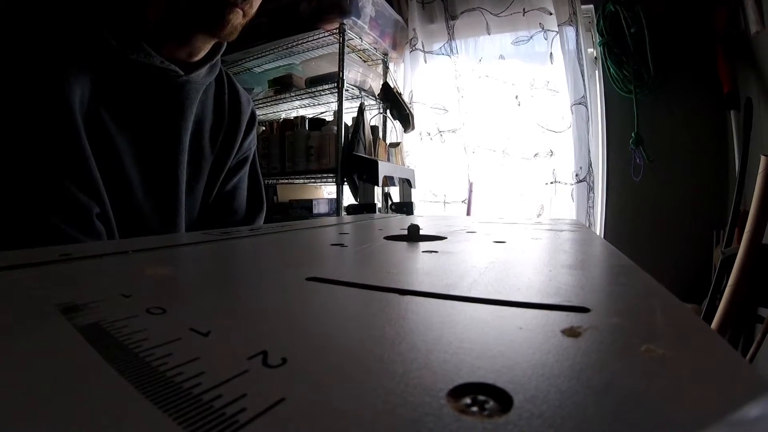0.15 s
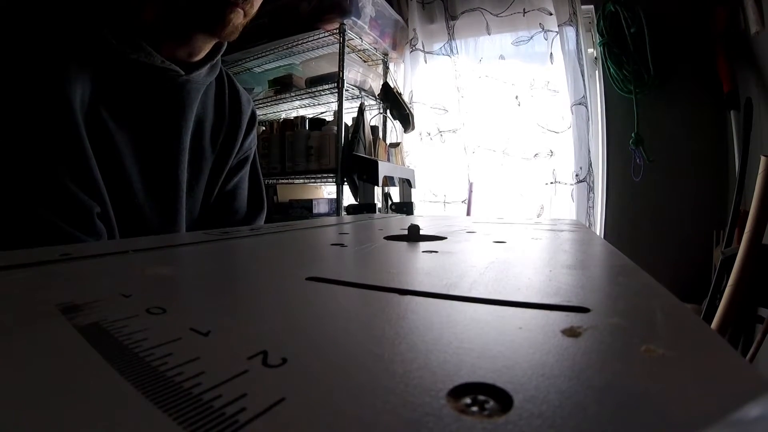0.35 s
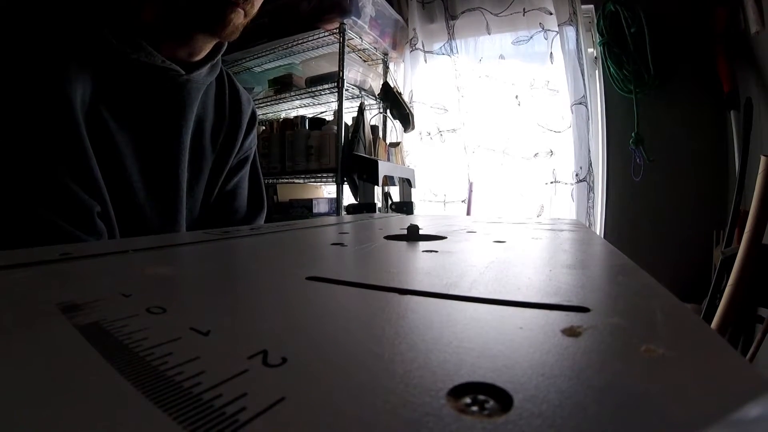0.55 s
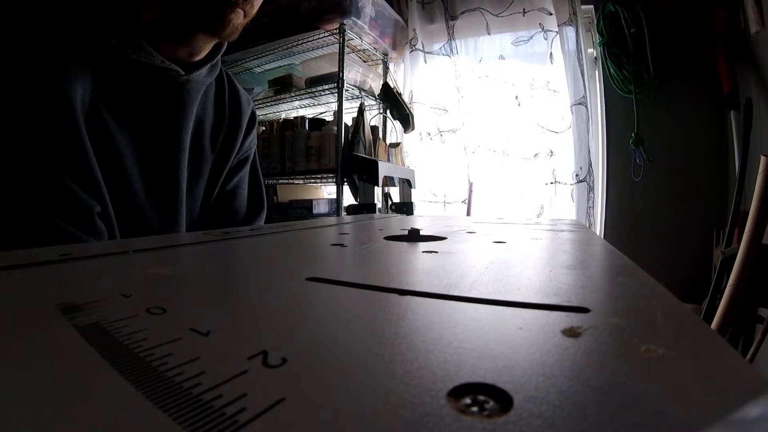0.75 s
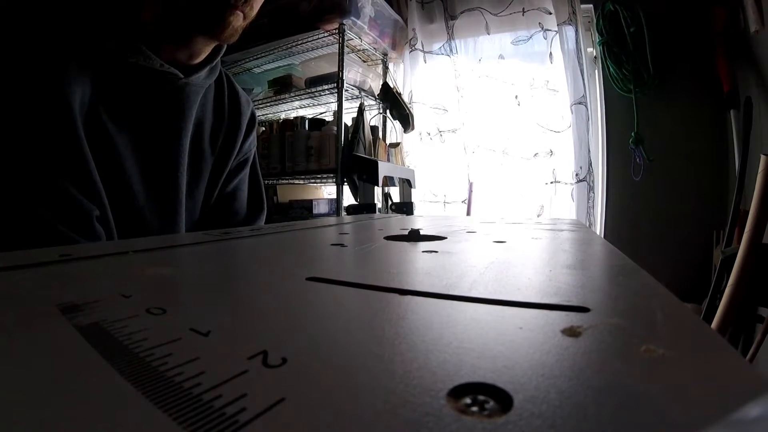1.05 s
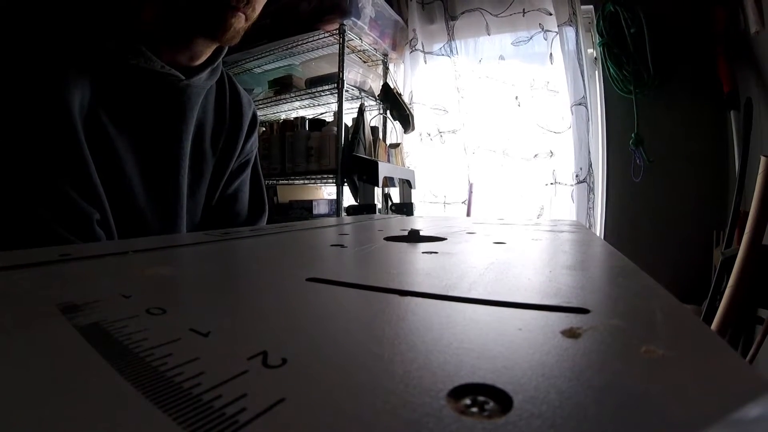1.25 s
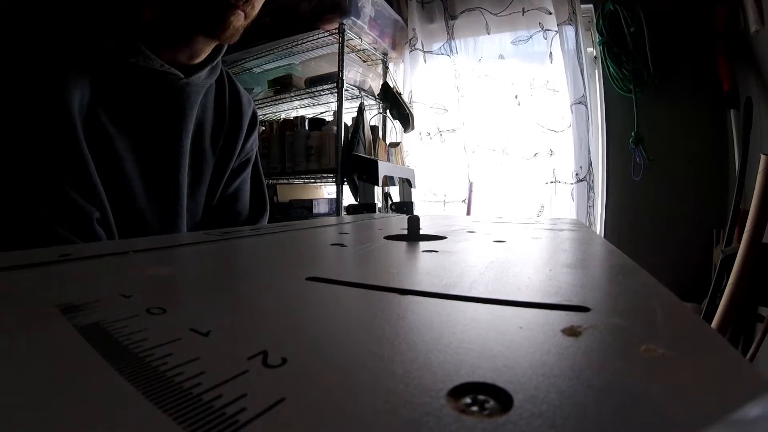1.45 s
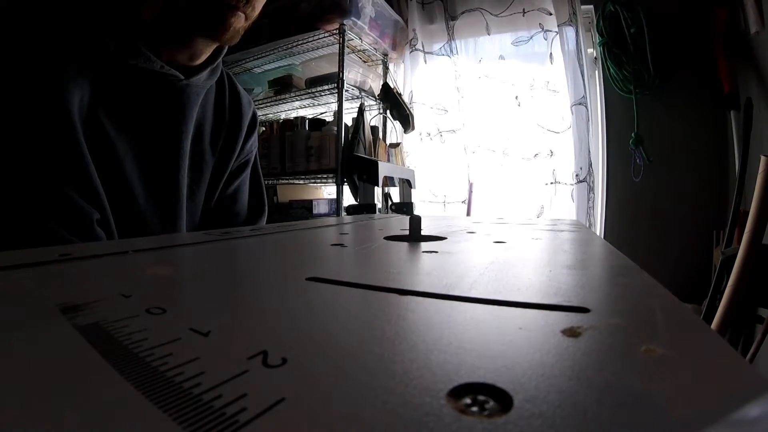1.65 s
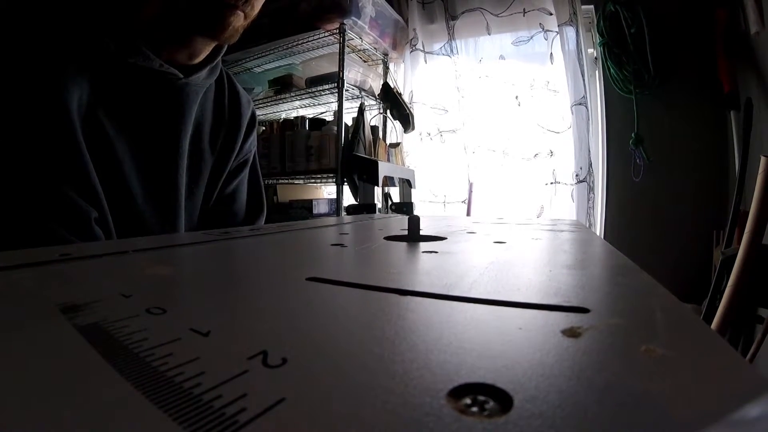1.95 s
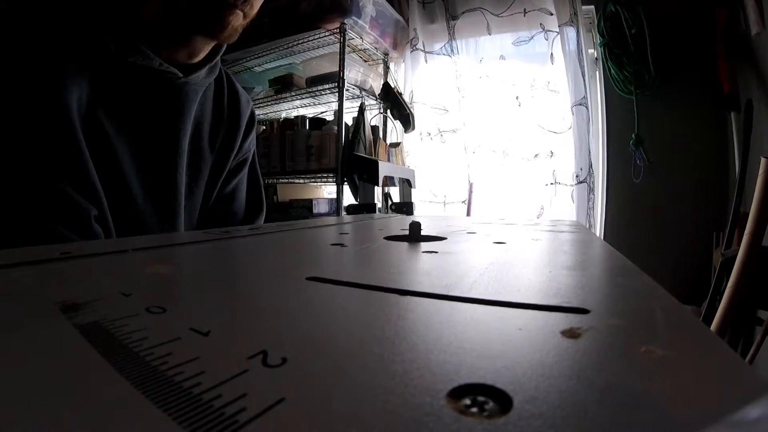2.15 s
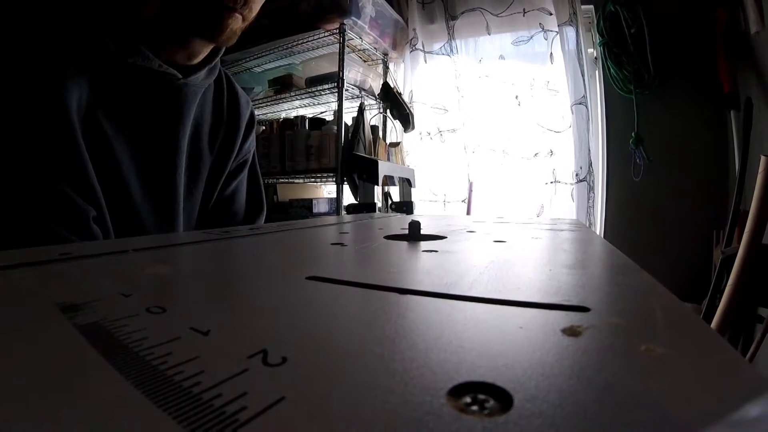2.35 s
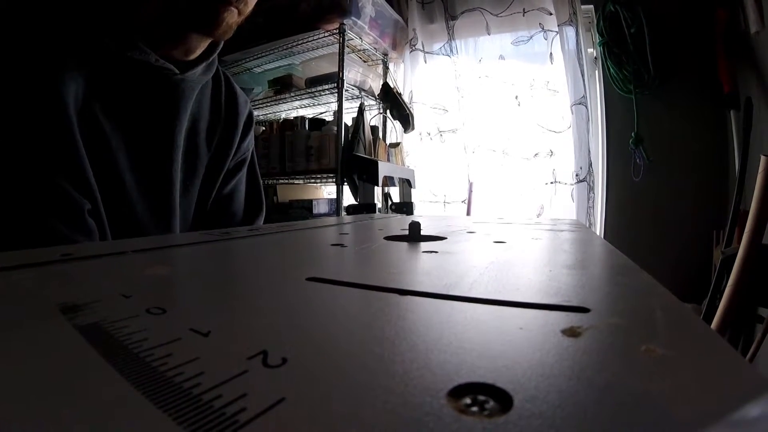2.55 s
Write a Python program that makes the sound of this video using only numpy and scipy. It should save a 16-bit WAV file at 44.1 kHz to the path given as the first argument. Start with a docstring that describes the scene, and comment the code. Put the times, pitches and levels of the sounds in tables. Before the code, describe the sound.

Router table lift catching with hard metallic clacks, amid blunt knocks and rubbing in a small workshop

```python
"""A bit is lowered and raised in a router table in a small workshop, heard from the table top.
A steady hiss and a wavering rumble of shaped noise run throughout, with thin ticks of brief noise.
Handling knocks ring the modes of the table, loose parts tap, and the table shudders as a low sine.
The carriage rubs in swells of grainy noise and small snaps as it slides. The steel lift catches with
three sharp clacks, each a crack of noise and a short ring. Nearby surfaces and the room answer."""
import sys
import numpy as np
from scipy import signal
from scipy.fft import rfft, irfft
from scipy.io import wavfile
from scipy.ndimage import uniform_filter1d, minimum_filter1d

SR = 44100
rng = np.random.default_rng(int(sys.argv[2]) if len(sys.argv) > 2 else 0)


def output_pcm(signal):
    """Save a mono or channel-first signal as 16-bit PCM at the path in sys.argv[1].

    Samples are clipped to [-1, 1] before scaling.
    """
    pcm = np.clip(np.atleast_2d(signal).T, -1, 1) * 32767
    wavfile.write(sys.argv[1], SR, np.round(pcm).astype(np.int16))


N = 119070  # length in samples


def from_db(db):
    """Turn decibels into gain."""
    return 10 ** (np.asarray(db) / 20)


def seconds():
    """Time of every sample."""
    return np.arange(N) / SR


def at_hz(points, hz, column=1):
    """Read a column of a table along a log-frequency axis."""
    points = np.array(points)
    return np.interp(np.log(hz + 1e-9), np.log(points[:, 0]), points[:, column])


def lowpass(x, order, hz):
    """Roll off the treble above a frequency."""
    return signal.sosfilt(signal.butter(order, hz, fs=SR, output="sos"), x)


def add(out, start_s, x):
    """Mix a sound in at its start time, cut at the end of the scene."""
    start = max(int(start_s * SR), 0)
    out[start:start + len(x)] += x[:max(N - start, 0)]


def noise(spectrum):
    """Steady noise of a given colour, rms 1."""
    gain = from_db(at_hz(spectrum, np.fft.rfftfreq(N, 1 / SR)))
    x = irfft(rfft(rng.standard_normal(N)) * gain, N)
    return x / x.std()


def roughness(swing_db, points_per_s):
    """A gain that wanders in dB between random points."""
    return from_db(swing_db * np.interp(seconds() * points_per_s, np.arange(N), rng.standard_normal(N)))


def burst(x, hold_s, t60_s):
    """Hold a sound briefly, then let it die by 60 dB per t60."""
    after_hold = np.maximum(seconds()[:len(x)] - hold_s, 0)
    return x * from_db(-60 * after_hold / t60_s)


def coloured(x, points):
    """Filter by a table of (Hz, dB) in minimum phase, so nothing sounds ahead of the impact."""
    log_gain = np.log(from_db(at_hz(points, abs(np.fft.fftfreq(len(x), 1 / SR)))))
    response = np.exp(np.conj(signal.hilbert(log_gain)))
    return np.fft.ifft(np.fft.fft(x) * response).real


def contact(spectrum, hold_s, t60_s, size=4096):
    """One impact as a brief, even burst of noise, rms about 1 while it is held."""
    envelope = burst(np.ones(size), hold_s, t60_s)
    x = rng.standard_normal(size) * envelope
    # flatten the spectrum and reshape the envelope in turn, so that no frequency sticks out
    for _ in range(3):
        flat = irfft(np.exp(1j * np.angle(rfft(x))))
        x = flat * np.sqrt(envelope)
    x = coloured(x, spectrum)
    return x * np.linalg.norm(envelope) / np.linalg.norm(x)


def ring(modes, gains_db, spread_s):
    """Struck modes as dying sines, each reached by the blow at a slightly different moment."""
    hz, db, t60_s = np.transpose(modes)[:, :, None]
    late, sign = rng.random((2, len(modes), 1))
    t = np.maximum(seconds()[:SR // 2] - late * spread_s, 0)
    level = from_db(db + gains_db[:, None] - 60 * t / t60_s)
    return np.sum(np.sign(sign - .5) * level * np.sin(2 * np.pi * hz * t), axis=0)


# Colour of the workshop hiss. Each row: frequency in Hz, relative density in dB per Hz.
HISS_COLOUR = [(20, -11), (70, -7.5), (95, -8.5), (140, -8.5), (190, -9.5), (330, -14), (450, -12.5),
               (700, -16.5), (1300, -17.5), (1750, -23), (2300, -29), (3800, -35), (4700, -34), (5800, -38),
               (6500, -42.5), (8500, -48), (12400, -61.5)]
HISS_DB = -41


def hiss():
    """Steady workshop hiss: noise of a fixed colour."""
    return from_db(HISS_DB) * noise(HISS_COLOUR)


# Colour of the low rumble. Each row: frequency in Hz, relative density in dB per Hz.
RUMBLE_COLOUR = [(15, -39), (28, -7), (38, 8), (54, -6), (75, -5.5), (140, -44), (300, -66)]
# Course of the rumble. Each row: time in seconds, level in dB.
RUMBLE_LEVEL = [(0, -42), (.3, -45.5), (.6, -38.5), (1.2, -37), (2.3, -34), (2.7, -47.5)]


def rumble():
    """Low rumble: deep noise whose level glides from point to point."""
    level_db = np.interp(seconds(), *np.transpose(RUMBLE_LEVEL))
    return from_db(level_db) * noise(RUMBLE_COLOUR)


# Faint thin ticks. Each row: start in seconds, level in dB before the trim.
TICKS = [(0.075, -42), (1.073, -40), (1.253, -41.5), (1.5469, -41.5), (1.6585, -42), (1.796, -40),
         (1.93, -38.5), (2.3172, -45), (2.389, -41.5), (2.4698, -39.5), (2.546, -48)]
# Colour of a tick. Each row: frequency in Hz, relative density in dB per Hz.
TICK_COLOUR = [(2500, -26), (4300, 3), (5200, -1), (6200, -1), (7500, -25), (11000, -24)]
TICK_TRIM_DB, TICK_HOLD_S, TICK_T60_S = -7.5, 0.00071, 0.015


def ticks():
    """Tiny dry ticks: very short bursts of high noise."""
    out = np.zeros(N)
    for start_s, db in TICKS:
        tick = contact(TICK_COLOUR, TICK_HOLD_S, TICK_T60_S)
        add(out, start_s, from_db(db + TICK_TRIM_DB) * tick)
    return out


# Handling knocks on the table. Each row: start in seconds, level in dB, boom in dB, body in dB,
# brightness in Hz (where the treble rolls off).
KNOCKS = [(0.201, -33, 2, -0.5, 500), (0.360, -28, -0.5, 0, 1420), (0.513, -30, 0.5, 0.5, 2580),
          (0.638, -27, -1, 3, 1320), (0.826, -30, 8, 1.5, 500), (0.866, -21.5, -9, -4, 910),
          (0.888, -35.5, 13, 0, 604), (0.906, -33, 4.5, 0, 402), (1.008, -37.5, 10, 1, 700),
          (1.062, -45, 0, 5, 394), (1.33, -23.5, 1, -7, 600), (1.337, -32, 1.5, -2.5, 500),
          (1.363, -34.5, 6, 0, 1100), (1.382, -31, 3, -4.5, 1310), (1.44, -33, -8, 2, 800),
          (1.474, -29.5, 2, 3.5, 700), (1.494, -31, 6.5, 1, 510), (1.615, -27, -5, 0.5, 400),
          (1.847, -34.5, 5.5, 0, 303), (1.861, -28, -5, -0.5, 700), (2.076, -28.5, 3, -1.5, 400),
          (2.13, -14.5, -13, -5.5, 470), (2.146, -23.5, -3, -1.5, 550), (2.166, -28, 2, -5, 332),
          (2.274, -43.5, 12.5, -2, 347), (2.398, -33, 4.5, 0, 543), (2.477, -53, 14.5, 4, 400)]
# Modes of the table. Each row: frequency in Hz before the detune, level in dB, t60 in seconds.
TABLE_MODES = [(55.5, -6, 0.27), (99.8, -0.5, 0.12), (121.9, -2, 0.19), (154.5, -5, 0.16),
               (228.5, -13, 0.17), (281.2, -6, 0.1), (321.5, -0.5, 0.11), (346.3, -2.5, 0.11),
               (423.5, -5.5, 0.1), (620, -16, 0.017), (702, -8.5, 0.056), (903, -8.5, 0.078),
               (1180, -28, 0.047), (1190, -2, 0.036), (1760, -0.5, 0.023)]
# Colour of the thud at contact. Each row: frequency in Hz, relative density in dB per Hz.
THUD_COLOUR = [(60, -6), (150, 2.5), (280, 6), (600, 11.5), (1400, 3), (2200, -10), (3500, -8.5),
               (5000, -17), (9000, -23.5)]
THUD_DB, THUD_HOLD_S, THUD_T60_S = -4.5, 0.0054, 0.012  # level against the ring
BOOM_TOP_HZ, BODY_TOP_HZ = 200, 385  # boom modes lie below the first, body modes between the two
KNOCK_DETUNE = 0.042  # largest share by which a mode shifts from blow to blow
KNOCK_SPREAD_S = 0.00431


def knocks():
    """Blunt blows ring the table, each a little differently; a softer contact is duller."""
    out = np.zeros(N)
    hz = np.array(TABLE_MODES)[:, 0]
    for start_s, db, boom_db, body_db, bright_hz in KNOCKS:
        modes = np.array(TABLE_MODES)
        modes[:, 0] *= 1 + KNOCK_DETUNE * (2 * rng.random(len(hz)) - 1)
        gains_db = np.select([hz < BOOM_TOP_HZ, hz < BODY_TOP_HZ], [boom_db, body_db])
        blow = ring(modes, gains_db, KNOCK_SPREAD_S)
        add(blow, 0, from_db(THUD_DB) * contact(THUD_COLOUR, THUD_HOLD_S, THUD_T60_S))
        add(out, start_s, from_db(db) * lowpass(blow, 2, bright_hz))
    return out


# Light hard taps of loose parts. Each row: start in seconds, level in dB.
TAPS = [(0.3595, -39), (0.3655, -41), (0.5128, -31), (0.6383, -35.5), (0.6440, -40), (1.472, -32),
        (1.48, -39)]
# Colour of a tap. Each row: frequency in Hz, relative density in dB per Hz.
TAP_COLOUR = [(300, -2), (750, 6), (1300, 8.5), (1800, -12.5), (2500, -7), (4600, -13), (6500, -30),
              (11000, -43)]
TAP_HOLD_S, TAP_T60_S = 0.0021, 0.0093


def taps():
    """Loose parts tap: the crisp edge of a small contact, a short burst of noise."""
    out = np.zeros(N)
    for start_s, db in TAPS:
        add(out, start_s, from_db(db) * contact(TAP_COLOUR, TAP_HOLD_S, TAP_T60_S))
    return out


# The table shudders on its stand. Each row: start in seconds, level in dB.
SHUDDERS = [(0.369, -30.5), (0.872, -39), (1.161, -31.5), (1.348, -37), (1.479, -41), (1.659, -40.5),
            (1.866, -27.5), (2.166, -19)]
STAND_HZ, STAND_RISE_S, STAND_T60_S = 36.5, 0.026, 0.48


def shudders():
    """The whole table sways on its stand: a low sine that swells in and dies away."""
    out, t = np.zeros(N), seconds()[:SR]
    rise = np.minimum(t / STAND_RISE_S, 1)
    sway = burst(np.sin(2 * np.pi * STAND_HZ * t) * rise, STAND_RISE_S, STAND_T60_S)
    for start_s, db in SHUDDERS:
        add(out, start_s, from_db(db) * sway)
    return out


# Colour of the slips. Each row: frequency in Hz, relative level in dB.
SLIP_COLOUR = [(100, 4), (330, 10), (700, 12), (1300, -5), (1800, 6.5), (2400, -13), (4700, -10),
               (6500, -21), (11000, -46)]
SLIPS_PER_S, SLIP_JITTER = 160, 0.44  # median rate; spread of the gaps as a natural logarithm
SLIP_SWING_DB = 2.5


def slips():
    """Stick and slip: an uneven run of small snaps of either sign, rms 1."""
    out = np.zeros(N)
    gap, size = rng.standard_normal((2, SR // 20))
    gaps_s = np.exp(SLIP_JITTER * gap) / SLIPS_PER_S
    at = (np.cumsum(gaps_s) * SR).astype(int)
    snaps = from_db(SLIP_SWING_DB * size) * rng.choice([-1, 1], len(at))
    inside = at < N
    out[at[inside]] = snaps[inside]
    out = coloured(out, SLIP_COLOUR)
    return out / out.std()


# The carriage rubs. Each row: peak time in seconds, rise in seconds, fall in seconds (both as
# widths of a bell curve), level of the stroke in dB.
RUBS = [(0.815, 0.031, 0.055, -39.5), (1.06, 0.031, 0.061, -45.5), (1.375, 0.038, 0.019, -36),
        (1.446, 0.014, 0.016, -36.5), (1.475, 0.01, 0.018, -33.5), (1.835, 0.017, 0.033, -42.5)]
# Colour of the rub. Each row: frequency in Hz, relative density in dB per Hz.
RUB_COLOUR = [(100, 12.5), (300, 4), (800, 0.5), (1400, 0), (2300, -15), (5000, -32), (12000, -69)]
# Colour of the fine grit. Each row: frequency in Hz, relative density in dB per Hz.
GRIT_COLOUR = [(1500, -2), (3200, 4), (4800, -2.5), (6500, -11), (11000, -47)]
RUB_SWING_DB, RUB_GRAINS_PER_S = 2.5, 100
GRIT_DB, GRIT_SWING_DB, GRIT_GRAINS_PER_S = -18.5, 6, 390  # level against the rub
SLIP_DB = -7.5  # against the rub


def rubs():
    """Friction swells and fades as the carriage slides, with small slips and fine grit on top."""
    t, stroke = seconds(), np.zeros(N)
    for peak_s, rise_s, fall_s, db in RUBS:
        width_s = np.where(t < peak_s, rise_s, fall_s)
        stroke += from_db(db) * np.exp(-.5 * ((t - peak_s) / width_s) ** 2)
    rub = roughness(RUB_SWING_DB, RUB_GRAINS_PER_S) * noise(RUB_COLOUR)
    grit = from_db(GRIT_DB) * roughness(GRIT_SWING_DB, GRIT_GRAINS_PER_S) * noise(GRIT_COLOUR)
    return stroke * (rub + grit + from_db(SLIP_DB) * slips())


def resonate(x, hz, db):
    """Lift one resonance out of a sound."""
    width_hz = 175
    peak = signal.lfilter(*signal.iirpeak(hz, hz / width_hz, fs=SR), x)
    return x + (from_db(db) - 1) * peak


# Steel contacts, some hard ones just after a light first touch. Each row: start in seconds, level
# in dB, six colour gains in dB (one at each of COLOUR_HZ), lower resonance in Hz, its lift in dB,
# upper resonance in Hz, its lift in dB. The resonances shift with the height of the carriage.
CLACKS = [(0.8612, -32.5, 11, -3, 6, 6, -5, 0, 2700, 4, 3620, 3),
          (0.8635, -21.5, 4, -6, -1, 3.5, -8, -3, 2670, 11.7, 3700, 9.8),
          (1.3105, -34, -5, -2, 2, -3, -2, 5, 3200, 5, 5750, 5),
          (1.3124, -23.5, -5, 5, -7.5, -5, 0, -3.5, 3230, 12.7, 5630, 10),
          (1.327, -25.5, -1, -2, -11.5, 0.5, -8, -16, 2430, 12.5, 4170, 5),
          (1.829, -47.5, -8, -8, 3, 1, -4, -8, 2800, 4, 3400, 4),
          (1.8640, -38.5, 6, 1, -14, -21, -13, -19, 720, 6, 1770, 13),
          (2.1269, -33.5, 8, 9.5, -15, 0, -4, -9, 2850, 3, 4850, 3),
          (2.1298, -14.5, 1.5, -4.5, -1, 0.5, -1, -3, 2790, 10.5, 4760, 9.8)]
# Where the six colour gains sit, in Hz.
COLOUR_HZ = [800, 1700, 2700, 3650, 4800, 7500]
# Modes of the steel lift. Each row: frequency in Hz, level in dB, t60 in seconds.
LIFT_MODES = [(738, -16.5, 0.19), (935, -12, 0.051), (1166, -10, 0.052), (1290, -8.5, 0.049),
              (1690, -0.5, 0.056), (2000, -12.5, 0.077), (2176, -6.5, 0.035), (2594, 0.5, 0.03),
              (3200, -9.5, 0.04), (3700, -25, 0.019), (4715, -2.5, 0.02), (4810, -8, 0.022),
              (5760, -11, 0.042)]
# Colour of the crack. Each row: frequency in Hz, relative density in dB per Hz.
CRACK_COLOUR = [(300, -20), (900, 3), (1400, 6), (2350, 0.5), (2850, 2), (3300, -1.5), (4100, -5),
                (4900, 1), (5400, -6), (5900, -5), (6400, -16.5), (8400, -19.5), (10500, -34), (12000, -82)]
CRACK_DB, CRACK_HOLD_S, CRACK_T60_S = 1, 0.0025, 0.017  # level against the ring
LIFT_SPREAD_S = 0.001436
CLACK_TOP_HZ = 10700  # the clacks fall away above this


def clacks():
    """Steel meets steel: a crack through two resonances and the short ring of the lift."""
    crack, ringing = np.zeros((2, N))
    mode_hz = np.array(LIFT_MODES)[:, 0]
    for start_s, db, *colour, low_hz, low_db, high_hz, high_db in CLACKS:
        tint = np.transpose([COLOUR_HZ, colour])  # where the steel is struck colours both parts
        hit = coloured(contact(CRACK_COLOUR, CRACK_HOLD_S, CRACK_T60_S), tint)
        resonant = resonate(resonate(hit, low_hz, low_db), high_hz, high_db)
        add(crack, start_s, from_db(db + CRACK_DB) * hit)
        add(ringing, start_s, from_db(db + CRACK_DB) * (resonant - hit))
        add(ringing, start_s, from_db(db) * ring(LIFT_MODES, at_hz(tint, mode_hz), LIFT_SPREAD_S))
    # the tiny offset keeps the filter out of slow denormal numbers
    return lowpass(np.array([crack, ringing]) + 1e-18, 12, CLACK_TOP_HZ)


REFLECTION_DELAY_S = .007  # shared by the early scatter and the tail
# Early reflections off the table and the near walls. Each row: frequency in Hz, level in dB.
EARLY_COLOUR = [(200, -4), (1000, -8), (3000, -10), (5000, -10), (8000, -4), (11000, -9)]
EARLY_T60_S = 0.042


def early_reflections(x):
    """A quick scatter from nearby surfaces: convolution with a short, coloured burst of noise."""
    echoes = burst(rng.standard_normal(SR // 4), 0, EARLY_T60_S)
    echoes /= np.linalg.norm(echoes)
    gain = from_db(at_hz(EARLY_COLOUR, np.fft.rfftfreq(len(echoes), 1 / SR)))
    response = np.zeros(N)
    add(response, REFLECTION_DELAY_S, irfft(rfft(echoes) * gain)[:SR // 8])
    return signal.fftconvolve(x, response[:SR // 4])[:N]


# Workshop reverberation. Each row: frequency in Hz, level in dB, t60 in seconds.
ROOM = [(150, -9, 0.54), (397, -2.5, 0.52), (1200, -8, 0.36), (2980, -9, 0.27), (5000, -11, 0.29),
        (8950, -4.5, 0.29)]


def workshop(x):
    """Dense reflections: convolution with noise that dies at its own pace in each octave."""
    tail = np.zeros(N)
    edges_hz = 50 * 2. ** np.arange(9)
    for low_hz, high_hz in zip(edges_hz, edges_hz[1:]):
        centre_hz = np.sqrt(low_hz * high_hz)
        echoes = burst(rng.standard_normal(SR // 2), 0, at_hz(ROOM, centre_hz, column=2))
        echoes /= np.linalg.norm(echoes)
        octave = signal.butter(2, [low_hz, high_hz], "band", fs=SR, output="sos")
        band = signal.sosfilt(octave, echoes)
        add(tail, REFLECTION_DELAY_S, from_db(at_hz(ROOM, centre_hz)) * band)
    return signal.fftconvolve(x, tail[:SR])[:N]


# sends to the room: the ring of the lift reaches it less than the crack does
CRACK_WET_DB, RING_WET_DB, TABLE_WET_DB = 1.5, -12, -5.5


def scene():
    """Lift and table in the room, over hiss and rumble."""
    crack, ringing = clacks()
    table = knocks() + taps() + rubs()
    airborne = from_db(CRACK_WET_DB) * crack + from_db(RING_WET_DB) * ringing
    airborne += from_db(TABLE_WET_DB) * table
    room = early_reflections(airborne) + workshop(airborne)
    direct = crack + ringing + table + shudders() + ticks()
    return (direct + room + hiss() + rumble())[None]


PEAK_LIMIT, CUTOFF_HZ = .85, 12400  # limit as a share of full scale, before the cut


def record(dry):
    """A quick limiter holds the peaks and a steep low-pass cuts the top."""
    gain = PEAK_LIMIT / np.maximum(abs(dry[0]), PEAK_LIMIT)
    gain = minimum_filter1d(gain, size=65)  # dips about a millisecond around each peak
    gain = uniform_filter1d(gain, size=65)
    top_cut = signal.ellip(10, .1, 80, CUTOFF_HZ, fs=SR, output="sos")
    return signal.sosfilt(top_cut, dry * gain)


dry = scene()
out = record(dry)
output_pcm(out)
```